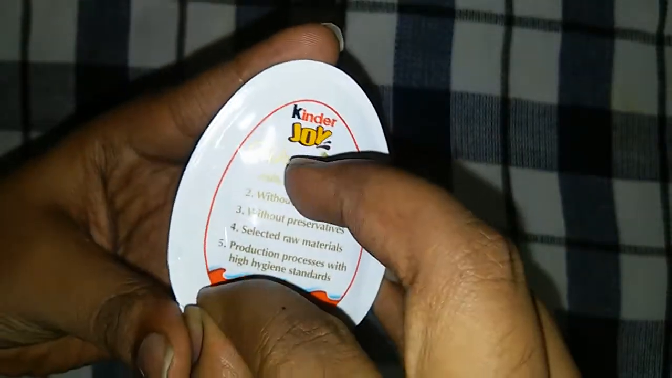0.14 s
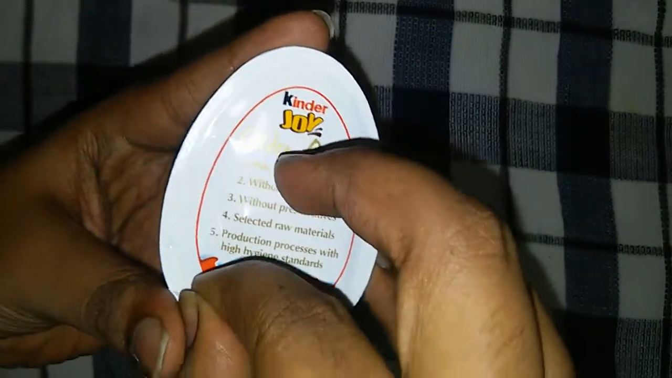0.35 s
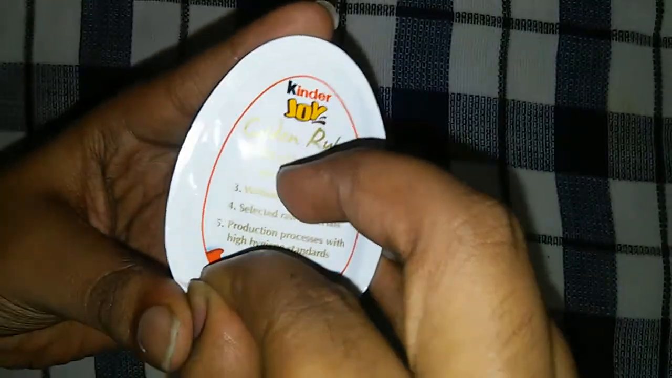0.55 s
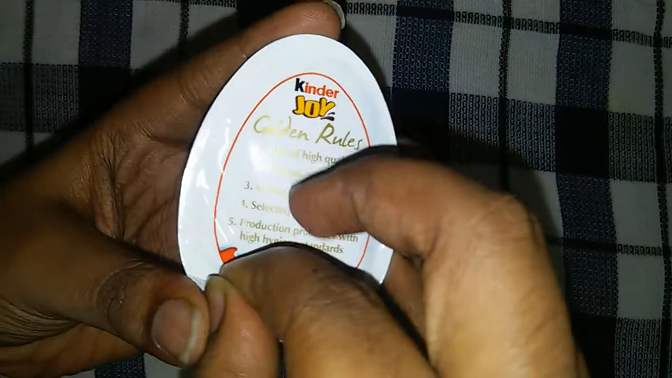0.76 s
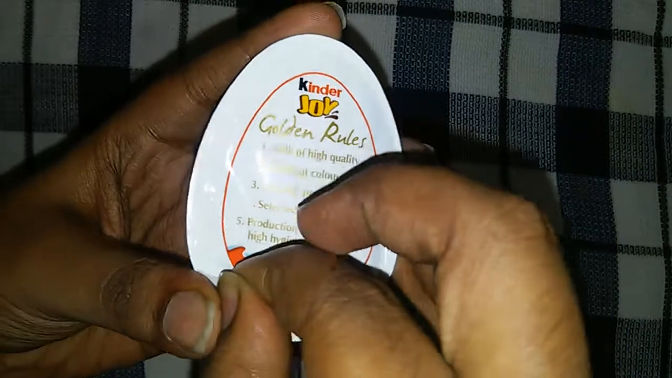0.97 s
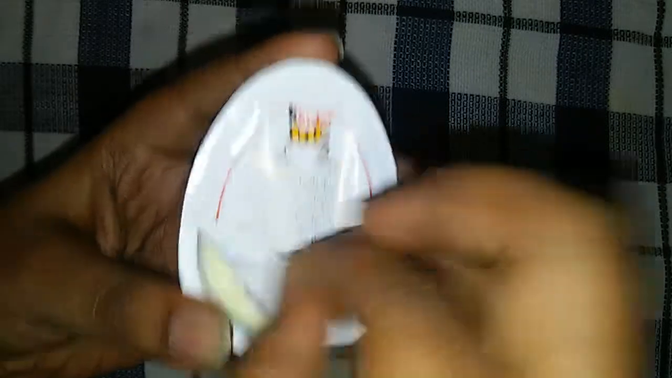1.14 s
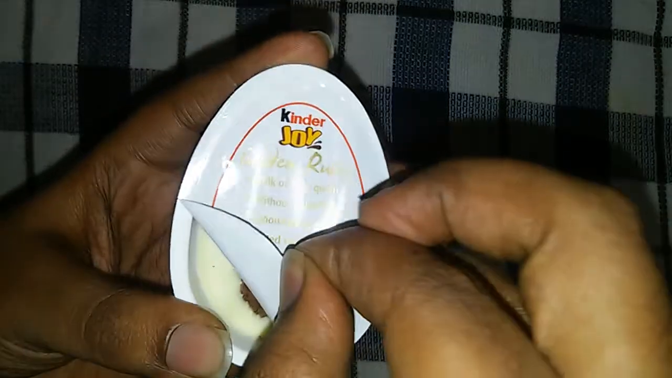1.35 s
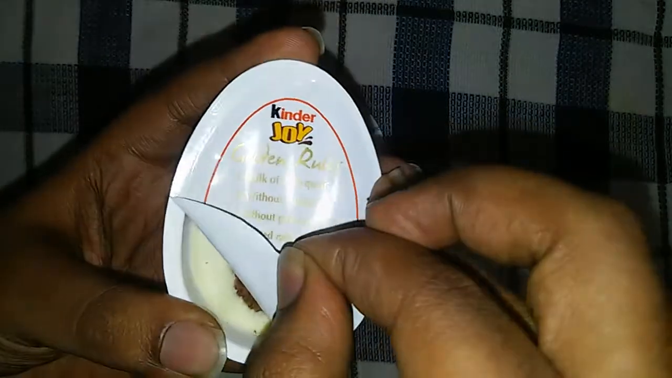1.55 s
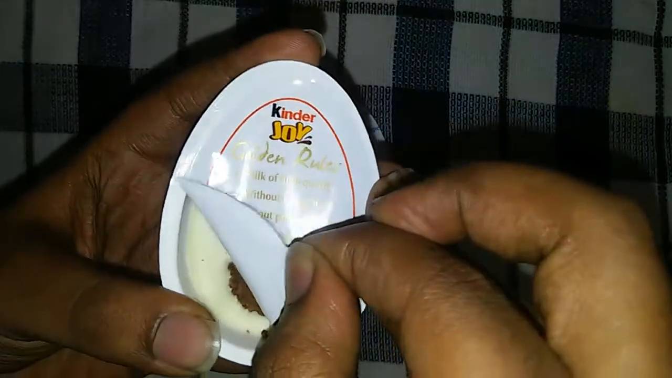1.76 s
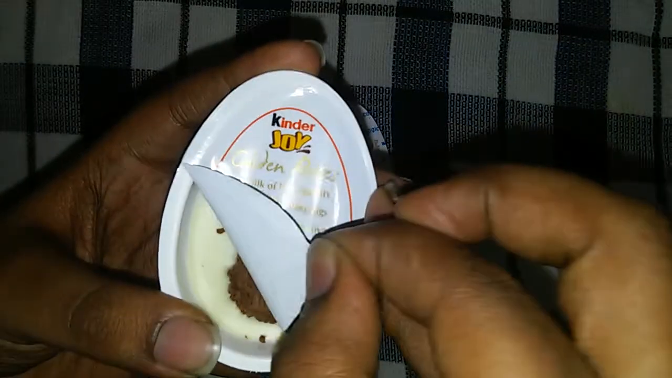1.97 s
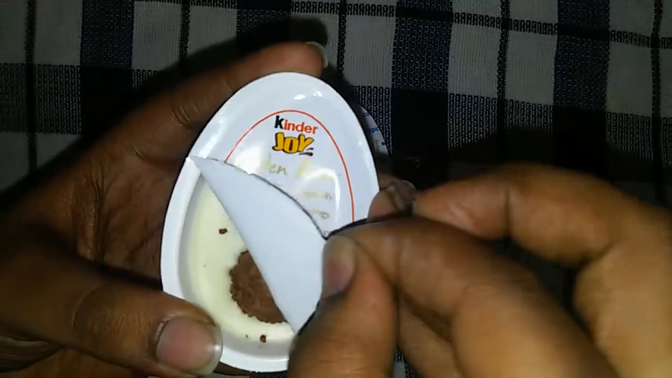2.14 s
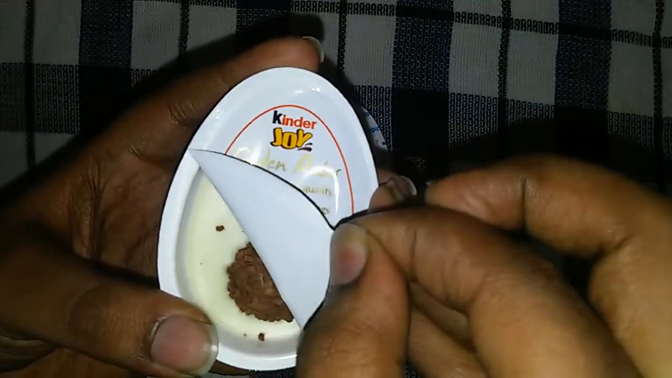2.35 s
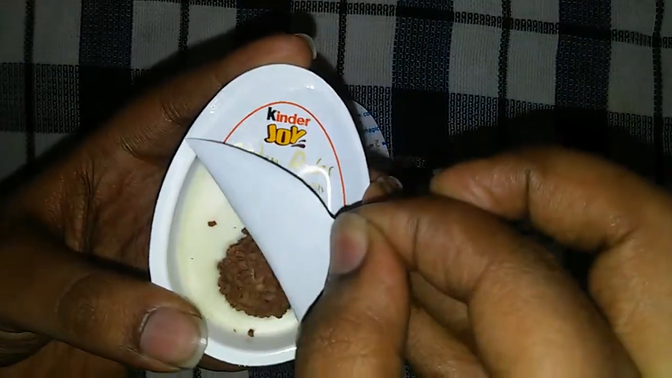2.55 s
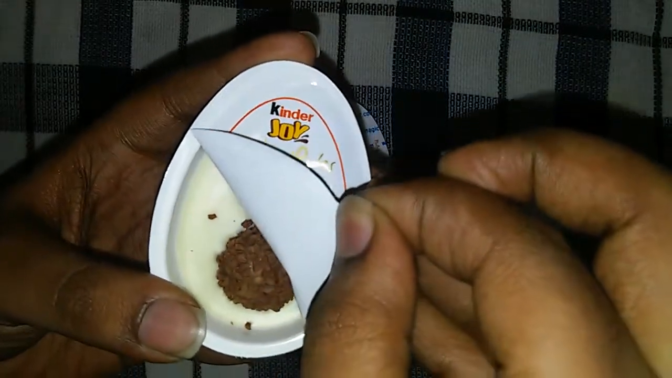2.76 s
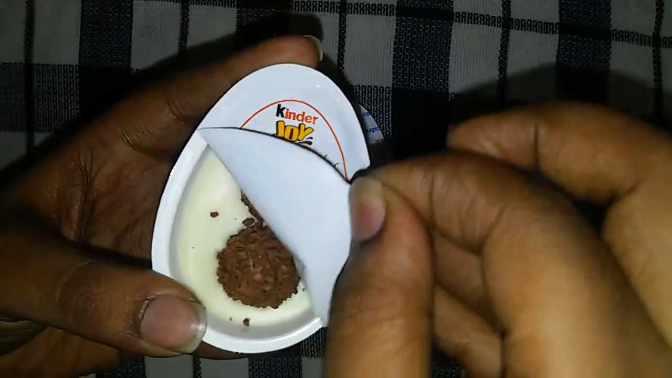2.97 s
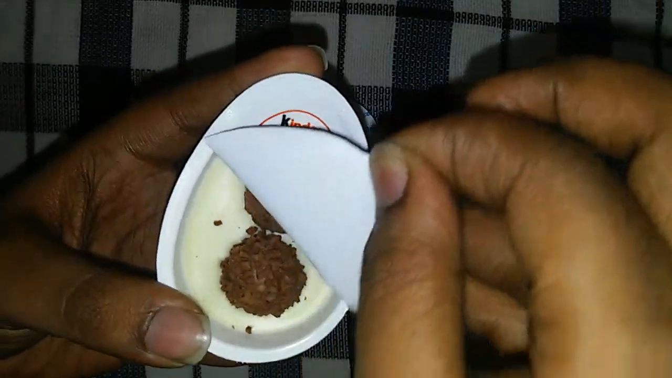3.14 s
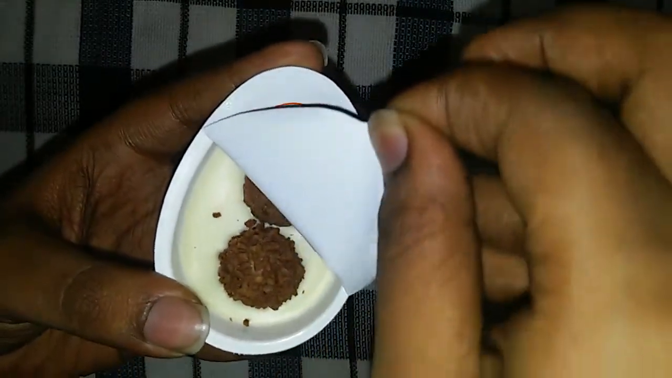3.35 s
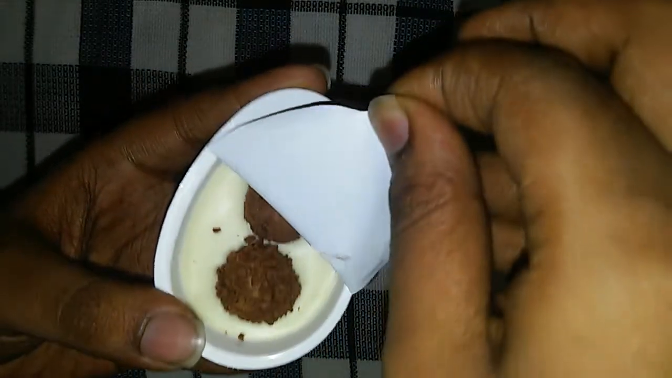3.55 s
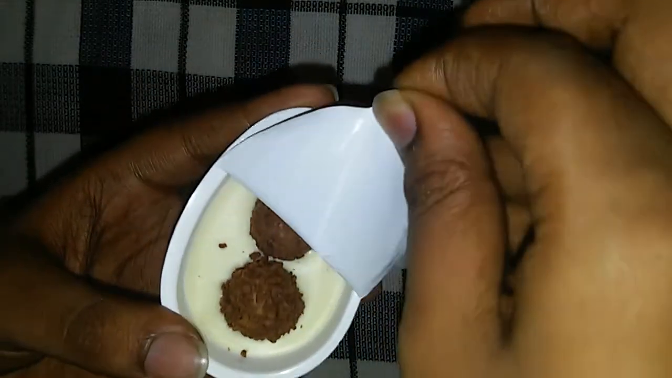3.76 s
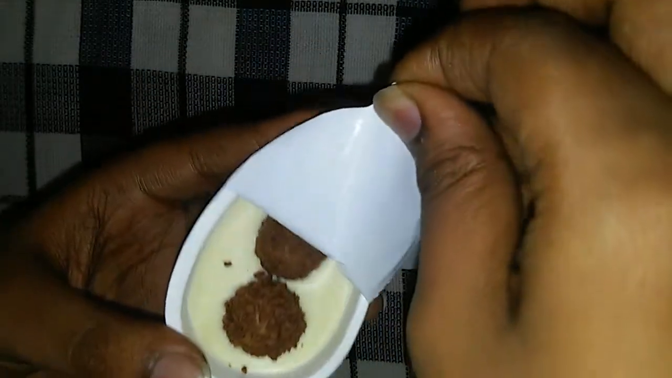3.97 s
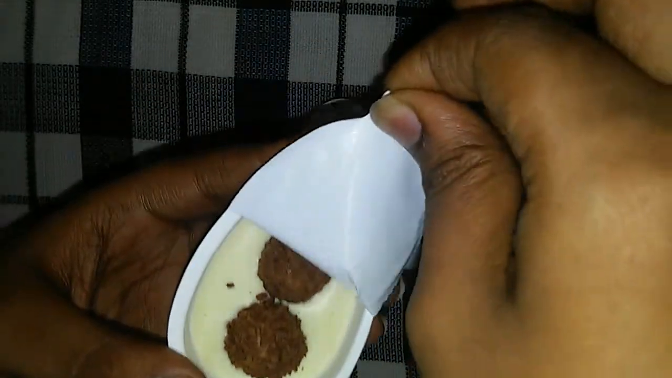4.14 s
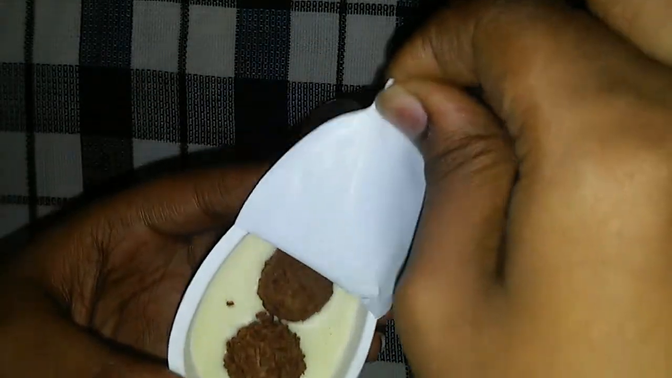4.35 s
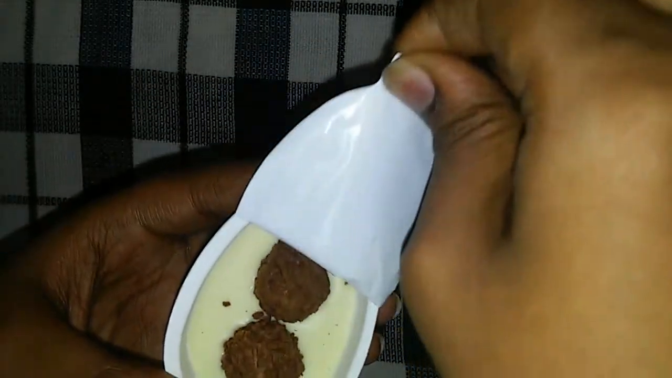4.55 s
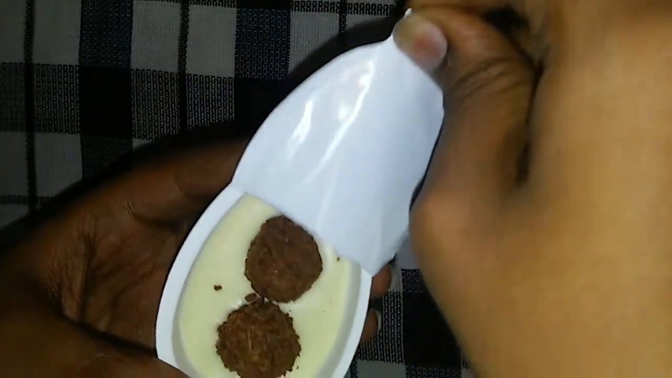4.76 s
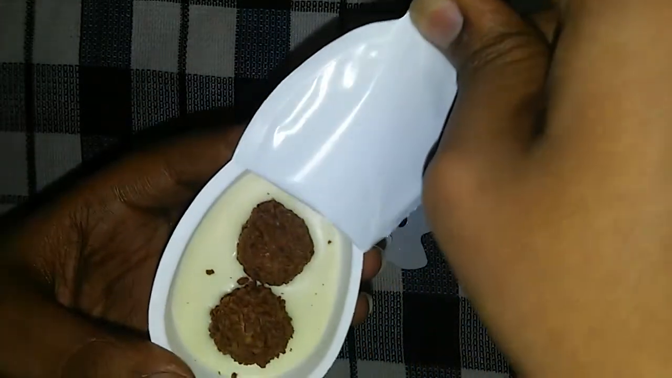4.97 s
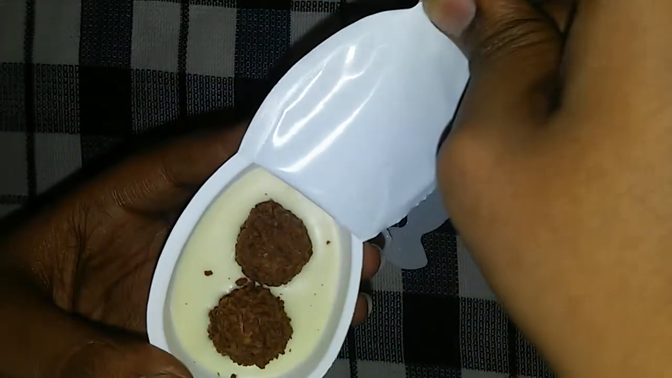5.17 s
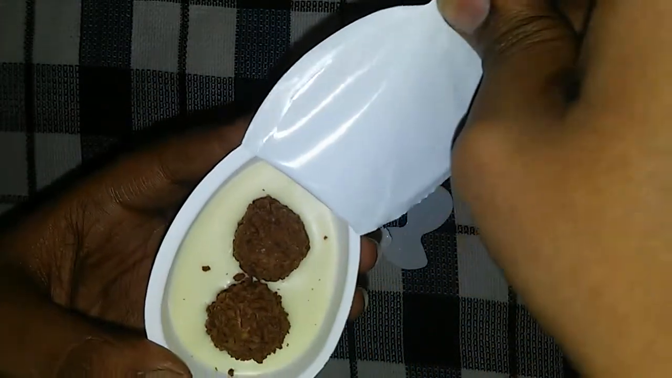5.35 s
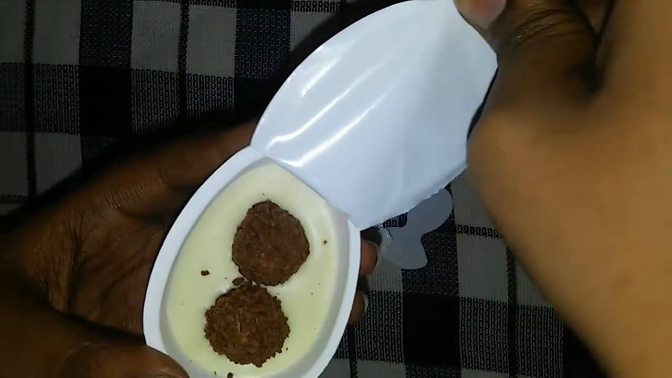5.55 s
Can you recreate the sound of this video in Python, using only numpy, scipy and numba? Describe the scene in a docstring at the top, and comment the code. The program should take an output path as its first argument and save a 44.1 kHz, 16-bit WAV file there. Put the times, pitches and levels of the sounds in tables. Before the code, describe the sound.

A foil lid is slowly peeled off a small plastic tray, close to a phone microphone in a bare room. After about a second of soft hand bumps and rumble, the seal gives way in a cluster of sharp, bright snaps, then in scattered single cracks until the end. Behind them a ceiling fan's bearing faintly squeaks and scrapes at a regular pace, and its soft draught swells and sinks with each sound.

```python
"""Peeling a foil lid

A foil lid is peeled slowly off a small plastic tray, close to a phone in a bare room. The seal gives way
in sharp snaps that ring the tray and the lid; the hands bump and rumble softly. Behind them a ceiling
fan's bearing squeaks and scrapes about three times in two seconds. The phone's noise suppressor opens
at each sound and sinks again, so the fan's draught and a thin whine swell and ebb."""
import sys
import numpy as np
from scipy import signal
from scipy.fft import rfft, irfft, next_fast_len
from scipy.io import wavfile
from scipy.ndimage import uniform_filter1d, map_coordinates
from numba import njit

SR = 44100
rng = np.random.default_rng(int(sys.argv[2]) if len(sys.argv) > 2 else 0)


def master(y):
    """Save y as 16-bit WAV."""
    cut = np.clip(np.atleast_2d(y).T, -1, 1)
    pcm = np.round(cut * 32767)  # scale
    wavfile.write(sys.argv[1], SR, pcm.astype(np.int16))


N = 247401
TIME_S = np.arange(N) / SR


def amp(db):
    """Turn decibels into a gain to multiply by."""
    return 10 ** (np.asarray(db) / 20)


def unit(x):
    """Scale x to an average (rms) level of 1."""
    return x / np.sqrt(np.mean(x ** 2) + 1e-20)


def along(points, hz):
    """Read a (pitch, value) table at hz, on a musical (log) scale."""
    pitches, values = np.transpose(points)
    return np.interp(np.log(hz + 1), np.log(pitches + 1), values)


def arch(progress):
    """Rise from 0 to 1 and fall back as progress goes from 0 to 1."""
    return np.abs(np.sin(np.pi * np.clip(progress, 0, 1)))


def wobble(rate, size=N):
    """A smooth curve through `rate` random values a second."""
    points = rng.standard_normal(int(size * rate / SR) + 4)
    return map_coordinates(points, [np.arange(size) * rate / SR])


def filtered(x, response):
    """Scale each frequency in x by the gain response(hz)."""
    size = next_fast_len(len(x) + 8192)
    return irfft(rfft(x, size) * response(np.fft.rfftfreq(size, 1 / SR)), size)[:len(x)]


def noise(spectrum, size=N):
    """Noise at level 1; the spectrum table sets how its pitches balance."""
    return unit(filtered(rng.standard_normal(size), lambda hz: amp(along(spectrum, hz))))


def resonate(x, hz, octaves):
    """Let x ring in a band around hz, `octaves` wide."""
    half = 2 ** (octaves / 2)
    edges = [min(hz / half, SR * .4), min(hz * half, SR * .47)]
    return signal.sosfilt(signal.butter(2, edges, 'bandpass', fs=SR, output='sos'), x)


def patchy(x, depth_db, frame_samples):
    """Give x random louder and softer patches in time and pitch."""
    frames = signal.stft(x, nperseg=frame_samples)[2]
    patches = uniform_filter1d(rng.standard_normal(frames.shape), 3, axis=0)
    patches = unit(uniform_filter1d(patches, 4, axis=1))
    return unit(signal.istft(frames * amp(depth_db * patches), nperseg=frame_samples)[1][:len(x)])


def add(track, start_s, x):
    """Mix x into the track at start_s."""
    start = max(round(start_s * SR), 0)
    part = x[:max(len(track) - start, 0)]
    track[start:start + len(part)] += part


# How long the room takes to fade by 60 dB: pitch_hz, fade_s
ROOM_FADES = [(1500, .45), (5000, 0.11), (11000, 0.15), (16000, 0.35)]
def echo(x):
    """The walls throw x back, and each pitch dies away at its own speed."""
    hz, t, frames = signal.stft(rng.standard_normal(SR * 2 // 3), SR, nperseg=256)
    fading = amp(-60 * t / along(ROOM_FADES, hz)[:, None])
    tail = signal.istft(frames * fading, SR, nperseg=256)[1]
    tail = np.concatenate([np.zeros(SR // 500), tail])  # arrives 2 ms late
    return signal.fftconvolve(x, tail / np.linalg.norm(tail))[:N]


def whine(pitch_hz=15625, level_db=-60):
    """A thin, steady electrical tone."""
    return amp(level_db) * np.sin(2 * np.pi * pitch_hz * TIME_S)


# The tone of the moving air: pitch_hz, level_db
DRAUGHT_SPECTRUM = [(25, -10), (55, -5.5), (90, 6.5), (170, 0), (290, -7), (490, 0), (780, -9.5),
                    (1200, -10), (2200, -21.5), (5000, -26.5), (11000, -21.5), (16000, -23)]
def draught(level_db=-47):
    """The fan pushes air in a soft, slightly uneven rush."""
    gain = amp(level_db + 1.2 * wobble(16))
    return gain * patchy(noise(DRAUGHT_SPECTRUM), depth_db=2.5, frame_samples=1024)


# The tone of dry rubbing in the fan's bearing: pitch_hz, level_db
SCRAPE_SPECTRUM = [(1500, -48.5), (3400, -29), (4100, -14), (4600, -22.5), (6500, -16), (8500, -9.5),
                   (10300, -1), (12500, -4.5), (14500, -16), (16000, -18)]
def scrape(t, length_s, level_db):
    """The bearing slides in a grainy hiss that swells and fades."""
    grain_db = 1.1 * wobble(28, len(t)) + 2.5 * wobble(190, len(t))
    return amp(level_db + grain_db) * arch(t / length_s) ** 0.58 * noise(SCRAPE_SPECTRUM, len(t))


def sizzle(level_db=-59):
    """The bearing never quite stops rubbing."""
    return amp(level_db) * noise(SCRAPE_SPECTRUM)


def squeal(t, length_s, pitch_hz, fall_hz, lead_s, jitter_hz=70, waver_hz=22):
    """The bearing sings a thin, sinking note that turns rough after lead_s, when the contact bites."""
    drift = lambda rate: wobble(rate, len(t))
    bite = 0.82  # under 1, the squeal peaks early
    progress = np.minimum(t / (length_s + lead_s), 1)
    hz = pitch_hz - fall_hz * progress ** 2 + jitter_hz * drift(1600) + waver_hz * drift(35)
    phase = 2 * np.pi * np.cumsum(hz) / SR
    note = amp(-1.5 + 1.8 * drift(50)) * np.sin(phase) * arch(progress ** bite) ** 0.7
    frayed = phase + 0.5 * drift(480)  # uneven sticking and slipping frays the overtones
    overtones = np.sin(2 * frayed) + amp(-19) * np.sin(3 * frayed)
    contact = arch((np.maximum(t - lead_s, 0) / length_s) ** bite) ** .5
    return note + overtones * amp(1.4 * drift(170)) * contact


# One catch for each turn of the fan: start_s, length_s, squeal_db, fall_hz, scrape_db
FAN_TURNS = [(.055, 0.11, -38.5, 150, -43), (0.738, 0.12, -36, 270, -46), (1.39, 0.13, -37, 290, -43.5),
             (2.072, 0.13, -37.5, 131, -41), (2.775, 0.076, -36, 231, -41), (3.409, 0.13, -36, 264, -41.5),
             (4.06, 0.13, -37.5, 80, -41), (4.742, 0.14, -36, 212, -42), (5.453, 0.081, -39.5, 119, -46)]
# Lighter rubs between the catches: start_s, length_s, level_db
LIGHT_RUBS = [(1.616, 0.33, -45.5), (3.035, 0.11, -53.5), (3.825, 0.17, -48.5)]
def bearing(pitch_hz=5230, lead_s=.01, ring_db=-55.5, ring_fade_s=0.24):
    """Once a turn the bearing squeals, slips into a scrape and leaves the metal ringing."""
    track = np.zeros(N)
    t = np.arange(SR // 2) / SR
    for start_s, length_s, squeal_db, fall_hz, scrape_db in FAN_TURNS:
        add(track, start_s - lead_s, amp(squeal_db) * squeal(t, length_s, pitch_hz, fall_hz, lead_s))
        metal = unit(resonate(rng.standard_normal(len(t)), pitch_hz - fall_hz / 2, octaves=.05))
        ring = amp(ring_db - 60 * t / ring_fade_s) * metal
        add(track, start_s + 0.83 * length_s, scrape(t, 1.31 * length_s, scrape_db) + ring)
    for start_s, length_s, level_db in LIGHT_RUBS:
        add(track, start_s, scrape(t, length_s, level_db))
    return amp(-2) * track + amp(-1.5) * echo(track)  # the final levels, direct and off the walls


# The tone of the handling rumble: pitch_hz, level_db
RUMBLE_SPECTRUM = [(20, -7.5), (45, 5), (100, -4.5), (180, -14), (350, -40.5), (1000, -95)]
# The fingers tighten and pull: start_s, length_s, level_db
FINGER_PULLS = [(.58, .62, -41.5), (1.42, 0.52, -43), (2.075, 0.22, -59.5)]
# The tray bumps the fingers, peaking 7 dB above the listed level: start_s, level_db, pitch_hz
TRAY_BUMPS = [(.875, -26.5, 98.5), (.924, -24.5, 104), (1.426, -40.5, 110), (1.489, -36.5, 92),
              (1.575, -30, 60.4), (1.764, -30, 54.7), (1.921, -45.5, 80), (2.954, -33, 486)]
def hands():
    """Low rumble and soft bumps as the fingers take hold and pull."""
    effort = sum(amp(level_db) * arch((TIME_S - start_s) / length_s) ** 1.2
                 for start_s, length_s, level_db in FINGER_PULLS)
    track = effort * amp(3 * wobble(22)) * noise(RUMBLE_SPECTRUM)
    t = np.arange(SR // 6) / SR
    for start_s, level_db, pitch_hz in TRAY_BUMPS:
        push = np.exp(-t / 0.0021) * (1 + 0.73 * rng.standard_normal(len(t)))
        bump = resonate(push, pitch_hz, octaves=1.43)
        add(track, start_s - .002, amp(level_db + 7) * bump / np.abs(bump).max())
    return track


def foil_rustle(level_db=-44.5, size=SR // 8):
    """The loose foil bends in many tiny creases of uneven strength."""
    creases = rng.standard_normal(size) * amp(2.6 * wobble(241.3, size))
    return amp(level_db) * np.hanning(size) * unit(resonate(creases, hz=1470, octaves=1.73))


def snap(tray_hz, tray_db, lid_hz, lid_db, crack_hz, crack_db, room_db, fade_s=.012):
    """Tiny breaks in the seal make a bright crack that rings the lid and tray, then dies in the room."""
    t = np.arange(SR // 2) / SR
    fade = lambda seconds: 10 ** (-3 * t / seconds)  # down 60 dB in this time
    unit_start = lambda x: x / np.sqrt(np.mean(x[:SR * 7 // 1000] ** 2))  # level 1 over the first 7 ms

    def ring(hz, level_db, ring_s, octaves, notes_db):
        """One part answers the breaks with a burst of noise and three notes, new for each snap."""
        breaks = rng.standard_normal(len(t)) * (fade(ring_s) + amp(-17) * fade(0.063))
        notes_hz = hz * 2 ** (octaves * (np.linspace(-.3, .3, 3) + rng.uniform(-.1, .1, 3)))
        notes = np.sin(2 * np.pi * notes_hz[:, None] * t).sum(axis=0)
        notes *= fade(ring_s * 0.52) + amp(-17) * fade(.09)
        body = unit_start(resonate(breaks, hz, octaves))
        direct = unit_start(body + amp(notes_db) * unit_start(resonate(notes, hz, octaves)))
        # the room's echo builds within milliseconds and dies in two stages
        room_shape = (1 - np.exp(-t / 0.0032)) * (fade(0.17) + amp(-21.5) * fade(0.64))
        room = resonate(rng.standard_normal(len(t)) * room_shape, hz, octaves)
        room *= np.linalg.norm(direct) / np.linalg.norm(room)
        return amp(level_db) * (direct + amp(room_db) * room)

    tray = ring(tray_hz, tray_db, fade_s * 1.4, octaves=0.68, notes_db=-4)
    lid = ring(lid_hz, lid_db, fade_s, octaves=0.83, notes_db=-6)
    crack = ring(crack_hz, crack_db, fade_s * 0.54, octaves=0.59, notes_db=-25)
    bowl = ring(1000, tray_db - 17, .02, octaves=0.67, notes_db=-10.5)  # the tray's hollow
    knock = ring(520, tray_db - 25, .02, octaves=1.1, notes_db=-20.5)  # the tray kicks back in the hand
    return tray + lid + crack + bowl + knock


# The tray's ring shifts as the grip changes: time_s, pitch_hz
TRAY_PITCHES = [(3.1, 2230), (3.7, 1723), (4.5, 1423), (5.1, 2230)]
# The seal gives way: start_s, lid_db, lid_hz, tray_over_lid_db, crack_over_lid_db, room_over_snap_db
SEAL_SNAPS = [(1.1533, -38.5, 4730, 4.5, 14, -9.5), (1.1619, -35.5, 5750, 1, -5, 4),
              (1.168, -17, 5270, -4.5, 1, -6.5), (1.1952, -19.5, 6130, -2.5, -1.5, -5.5),
              (1.2912, -62.5, 4220, 19, -1.5, -13), (1.3488, -14.5, 4150, -12.5, -3, -7.5),
              (1.372, -41, 4190, 17.5, -10, -16), (1.387, -26.5, 4010, 0.5, -6.5, -9.5),
              (1.8866, -36.5, 4200, -4, 14, -12), (1.894, -22.5, 4500, 0, 1, -11),
              (2.0001, -35.5, 3280, 7, -10, -13.5), (2.1474, -21.5, 4680, -3.5, 3.5, -10.5),
              (2.9532, -31, 3490, 5.5, -4, -16.5), (3.052, -38, 3500, 0, 0.5, -7.5),
              (3.1201, -31.5, 4000, 1.5, -3.5, -9.5), (3.376, -17, 4510, -19.5, -6, 0),
              (3.7589, -26, 4750, 0.5, 1, -9.5), (3.8338, -44.5, 2850, 13.5, -13, -11.5),
              (4.045, -29.5, 3300, -13, -6, -6), (4.439, -40, 3810, 6, -15, -6),
              (4.5226, -24, 4590, -10, 8, -0.5), (5.109, -29, 5210, -8, 9, -10),
              (5.5635, -29, 6170, -8, 13, -6.5), (5.577, -34.5, 6530, -4.5, 21.5, 0.5)]
def peeling():
    """The seal lets go snap by snap, and the loose foil rustles once."""
    track = np.zeros(N)
    for start_s, lid_db, lid_hz, tray_over_lid_db, crack_over_lid_db, room_over_snap_db in SEAL_SNAPS:
        tray_hz = np.interp(start_s, *np.transpose(TRAY_PITCHES))
        crack_hz = 6600 + 0.84 * lid_hz  # the crack's pitch climbs with the lid's
        tray_db, crack_db = lid_db + tray_over_lid_db, lid_db + crack_over_lid_db
        add(track, start_s, snap(tray_hz, tray_db, lid_hz, lid_db, crack_hz, crack_db, room_over_snap_db))
    add(track, 2.29, foil_rustle())
    return track


def scene():
    """Lid, hands, fan and whine reach one microphone."""
    return (peeling() + hands() + bearing() + draught() + sizzle() + whine())[None]


@njit
def leaky_store(push, keep, least):
    """Like a leaky bucket that each push fills, held between least and 1."""
    out, held = np.zeros(len(push)), 0.0
    for i in range(len(push)):
        held = min(max(held * keep, least) + push[i], 1.0)
        out[i] = held
    return out


# How well the noise suppressor hears each pitch: pitch_hz, gain_db
SUPPRESSOR_HEARING = [(100, -7.5), (1500, 0)]
def suppress_noise(x, quiet_db=-49, open_db=-23.5, open_s=0.013, close_db_per_s=59.5, shut_db=-26.5):
    """Sound above quiet_db lifts the volume, which then sinks; sound at open_db opens it in open_s."""
    heard = filtered(x, lambda hz: amp(along(SUPPRESSOR_HEARING, hz)))
    power = uniform_filter1d(heard ** 2, size=128)
    push = np.maximum(power - amp(quiet_db) ** 2, 0) / (amp(open_db) ** 2 * open_s * SR)
    gain = leaky_store(push, float(amp(-close_db_per_s / SR)), float(amp(shut_db)))
    return x * np.interp(TIME_S + 0.00067, TIME_S, gain)  # opens just ahead of the sound


# The tone of the phone's own hiss: pitch_hz, level_db
HISS_SPECTRUM = [(100, 2), (2000, -3), (6000, -2.5), (13000, -5), (16000, -2.5)]
def record(dry):
    """The phone turns down quiet stretches, adds hiss, rounds off peaks and cuts the highest treble."""
    hiss_db, top_hz = -81, 16000
    x = suppress_noise(dry[0]) + amp(hiss_db) * noise(HISS_SPECTRUM)
    rounded = x / (1 + np.abs(x) ** 6) ** (1 / 6)
    return filtered(rounded, lambda hz: 1 / (1 + (hz / top_hz) ** 90))[None]


dry = scene()
out = record(dry)
master(out)
```